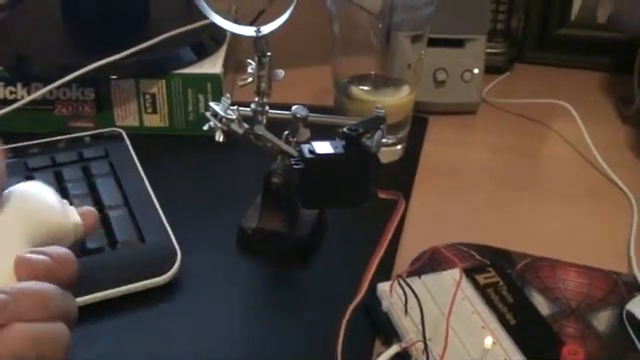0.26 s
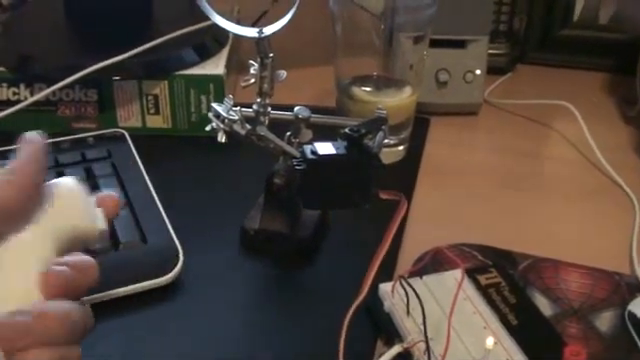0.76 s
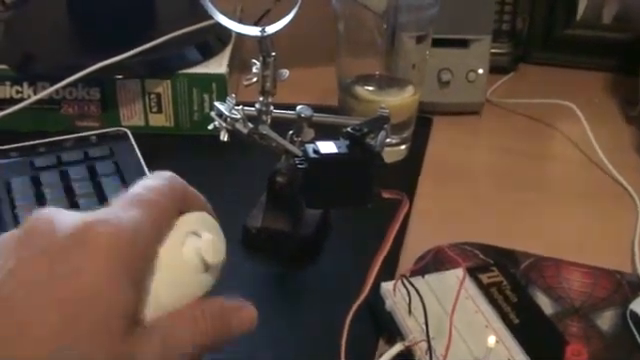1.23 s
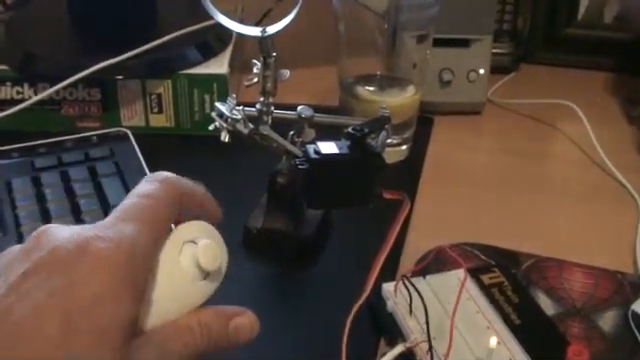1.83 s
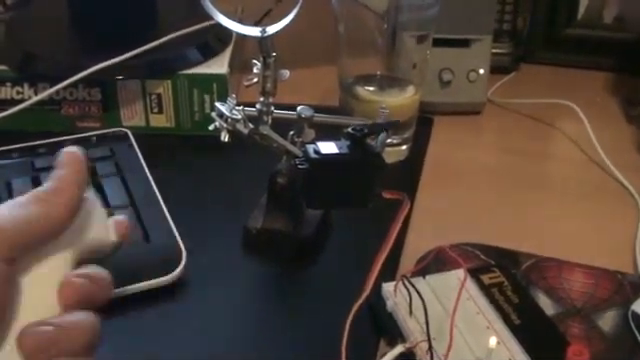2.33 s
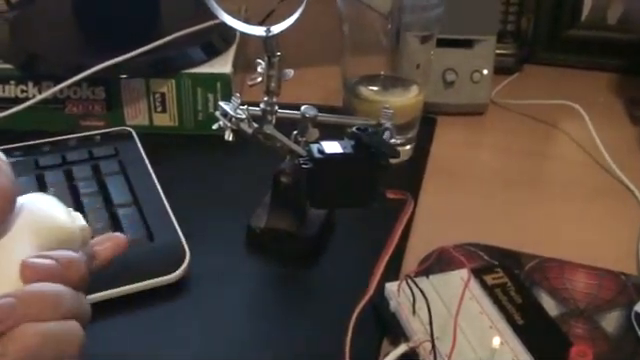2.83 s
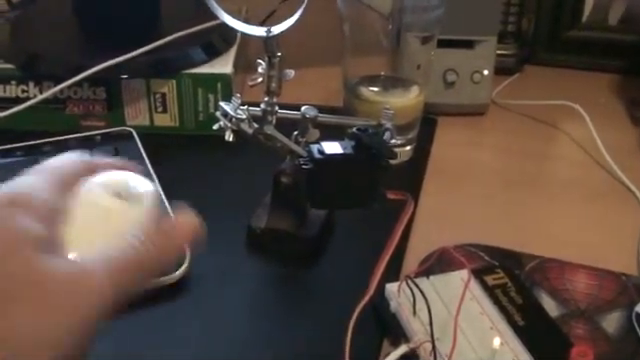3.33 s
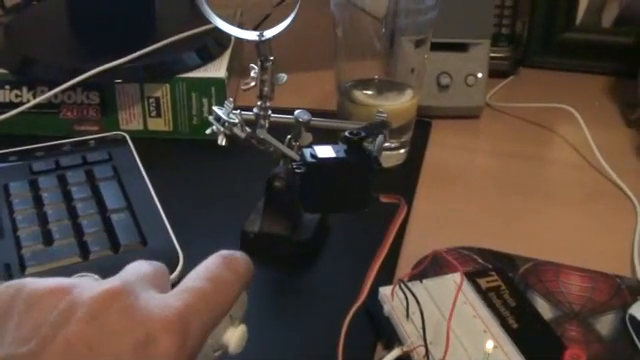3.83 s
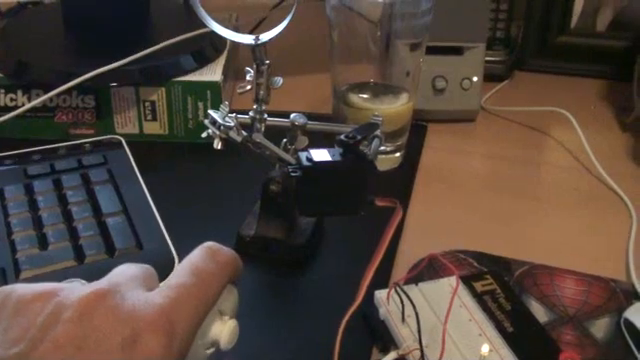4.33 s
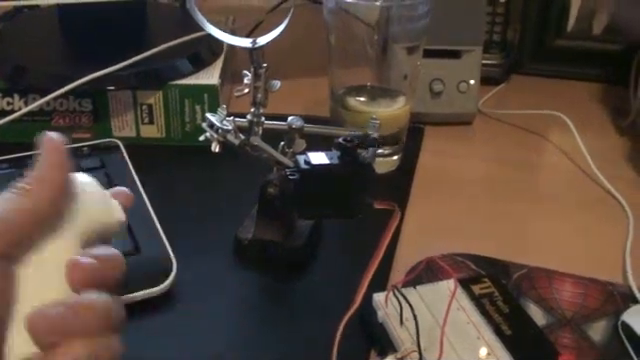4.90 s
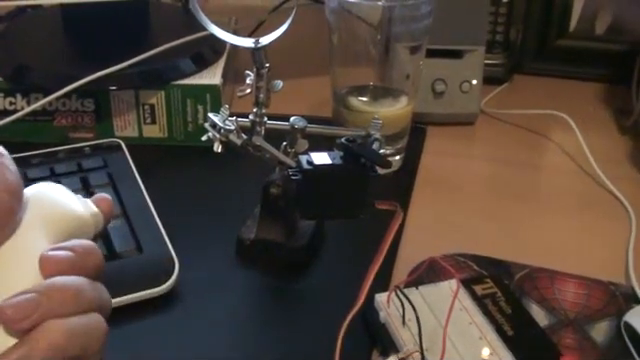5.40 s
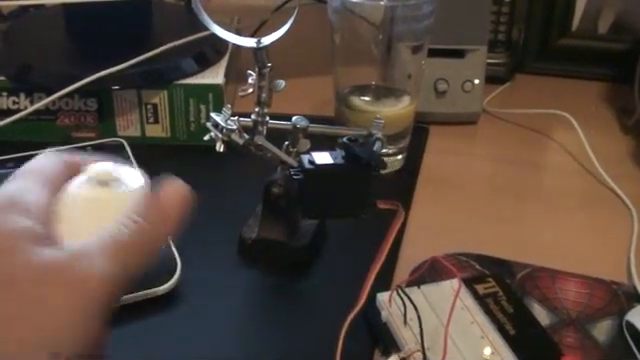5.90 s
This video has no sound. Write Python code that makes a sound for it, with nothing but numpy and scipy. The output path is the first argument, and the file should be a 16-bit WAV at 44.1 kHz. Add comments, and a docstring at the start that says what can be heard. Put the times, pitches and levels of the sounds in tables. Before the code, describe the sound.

A small geared motor on a desk makes four raspy, clicking whirs with quiet gaps between, plus a hand-held controller's sharp click and dull bump.

```python
"""A hobby servo in a clamp stand on a desk swings out and back twice: its gear teeth click and slide,
ringing the plastic case and the stand, with harder knocks, short twitches and low drones as the motor speeds up and slows.
A hand-held controller snaps and bumps: bursts of force ring its button and its hollow shell; the stand creaks once.
The small, fairly live room adds decaying noise as echoes, with fan air, microphone hiss and humming tones.
All is heard in stereo, with the servo's direct sound well above its echoes."""
import sys
import numpy as np
from scipy import signal
from scipy.fft import rfft, irfft
from scipy.io import wavfile

SR = 44100
rng = np.random.default_rng(int(sys.argv[2]) if len(sys.argv) > 2 else 0)


def wrap_up_sound(samples):
    """Save the sound to the file named by the first command line argument, as 16-bit audio."""
    columns = np.atleast_2d(samples).T
    # keep every value between -1 and 1, then stretch to whole-number steps
    tamed = np.clip(columns, -1, 1)
    steps = np.round(tamed * 32767).astype(np.int16)
    wavfile.write(sys.argv[1], SR, steps)


N = 271215
TIME = np.arange(N) / SR


def undb(db):
    """Decibels to gain."""
    return 10 ** (np.asarray(db) / 20)


def unit(x):
    """Scale a response to an energy of one."""
    return x / np.sqrt(np.sum(x ** 2))


def convolve(x, response):
    """Pass a sound through a response."""
    return signal.fftconvolve(x, response)[:N]


def spectrum(points, hz):
    """Gain at each frequency, interpolated over log frequency from (pitch_hz, level_db) points."""
    point_hz, point_db = np.transpose(points)
    return undb(np.interp(np.log(hz + 1), np.log(point_hz), point_db))


def walk(rate):
    """Random drift through `rate` new values a second; it holds the last value if they run out."""
    steps = rng.standard_normal(N // 100)
    return np.interp(TIME * rate, np.arange(len(steps)), steps)


def causal(gain):
    """The spectrum with these gains whose response dies away soonest (minimum phase)."""
    cepstrum = irfft(np.log(gain + 1e-9))
    half = len(cepstrum) // 2
    cepstrum[1:half] *= 2
    cepstrum[half + 1:] = 0
    return np.exp(rfft(cepstrum))


def body(modes, dips=(), size=8192):
    """Impulse response, of unit energy, of an object with (pitch_hz, width_hz, level_db) modes and dips."""
    f = np.fft.rfftfreq(size, 1 / SR) + 1

    def bell(hz, width):
        return 1 / (1 + ((f * f - hz * hz) / (f * width)) ** 2)

    power = sum(undb(db) ** 2 * bell(hz, width) for hz, width, db in modes)
    dip_gain = undb(sum(db * bell(hz, width) ** 2 for hz, width, db in dips))
    return unit(irfft(causal(np.sqrt(power) * dip_gain)))


def blows(rows, size=4096):
    """Contact force of (start_s, level_db, length_s) blows: a dying scrape with no colour of its own."""
    force, t = np.zeros(N + size), np.arange(size) / SR
    for start, db, length in rows:
        decay = np.exp(-np.log(1000) * t / length)  # 60 dB down after its length
        scrape = rfft(rng.standard_normal(size) * decay)
        white_scrape = irfft(scrape / causal(np.abs(scrape)))
        first = int(start * SR)
        force[first:first + size] += undb(db) * white_scrape
    return force[:N]


def disperse(x, spread=0.55, stages=(11, 26)):
    """A blow smears in time on its way through plastic parts, keeping its colour (all-pass filters)."""
    for lag in stages:  # in samples
        poles = np.r_[1, np.zeros(lag - 1), spread]
        x = signal.lfilter(poles[::-1], poles, x)
    return x


# colour of the air noise: pitch_hz, level_db (per Hz, relative)
AIR_COLOUR = [(15, -54), (25, -17), (49, -6.5), (81, -8), (106, -8.5), (181, 0), (213, -2), (363, -3),
              (415, -7), (475, -4), (515, -2.5), (558, -5.5), (856, -4), (2630, -11.5), (9000, -19.5),
              (15000, -19.5)]
# stereo width of the air noise: pitch_hz, side_minus_mid_db
AIR_WIDTH = [(60, -16), (110, -11.5), (200, -10.5), (380, -3), (690, -1.5), (1270, -1), (2350, -1.5),
             (4330, -3.5), (7970, -6.5), (11000, -8), (12000, -29)]
# course of the air noise: time_s, level_db (before the offset air_db)
AIR_LEVEL = [(0.0, -60.5), (1.63, -62.5), (3.77, -59), (6.15, -60)]
# mains and fan tones: pitch_hz, level_db (before the offset hum_db)
HUM_TONES = [(59.2, -77.5), (118.4, -76), (366.1, -75), (479.1, -74.5), (839.8, -76.5), (1626, -76.5),
             (1922, -81), (2885, -80)]


def background(air_db=4.0, hum_db=0.1, waver=0.00158):
    """Fan air and microphone hiss as coloured noise, with mains and fan tones of slightly wavering pitch."""
    f = np.fft.rfftfreq(N, 1 / SR)
    colour = spectrum(AIR_COLOUR, f)
    mid = irfft(rfft(rng.standard_normal(N)) * colour, N)
    side = irfft(rfft(rng.standard_normal(N)) * colour * spectrum(AIR_WIDTH, f), N)
    gain = undb(air_db + np.interp(TIME, *np.transpose(AIR_LEVEL))) / mid.std()
    hum = np.zeros(N)
    for hz, db in HUM_TONES:
        phase = 2 * np.pi * np.cumsum(hz * (1 + waver * walk(12))) / SR
        hum += undb(db + hum_db) * np.sqrt(2) * np.sin(phase)
    return gain * np.array([mid + side, mid - side]) + hum


# finger touches on the controller, and a creak of the servo stand at 3.477 s:
# start_s, snap_db (button ring), thud_db (shell ring), length_s (contact)
TOUCHES_AND_CREAK = [(1.801, -30.5, -26.5, 0.038), (2.008, -32, -40, 0.02), (2.012, -16.5, -36, .025),
                     (2.0262, -5, -41, 0.008), (2.0282, -12.5, -37, 0.0085), (2.539, -45, -17, 0.023),
                     (2.583, -43, -27, 0.0084), (3.477, -37.5, -30, 0.015)]
# ring of the button: pitch_hz, width_hz, level_db (relative)
BUTTON_RING = [(2000, 590, -9), (2700, 320, -1), (3560, 550, -6.5), (4340, 380, 2.5), (4500, 390, 1),
               (5600, 650, -8), (6630, 540, -7.5), (10000, 1100, -11), (12400, 660, -10)]
# hollow ring of the shell: pitch_hz, width_hz, level_db (relative)
SHELL_RING = [(648, 72, 3), (790, 120, -34), (1880, 420, -13.5)]


def controller_and_creak():
    """Each touch rings the button and the hollow plastic shell; the stand's creak borrows both rings."""
    snaps = blows([(start, snap_db, length) for start, snap_db, thud_db, length in TOUCHES_AND_CREAK])
    thuds = blows([(start, thud_db, length) for start, snap_db, thud_db, length in TOUCHES_AND_CREAK])
    return disperse(convolve(snaps, body(BUTTON_RING)) + convolve(thuds, body(SHELL_RING)))


def reverberation(build_s=0.0023, size=32768):
    """Diffuse echoes of the room: noise that builds up, then decays, lasting longest around 4 kHz."""
    t, f = np.arange(size) / SR, np.fft.rfftfreq(size, 1 / SR)
    centres_hz, t60s_s = [700, 4000, 13000], [0.4, 0.61, 0.43]
    noise, tail = rfft(rng.standard_normal(size)), np.zeros(size)
    for share, t60 in zip(np.eye(len(centres_hz)), t60s_s):
        band = irfft(noise * np.interp(f, centres_hz, share))
        tail += band * np.exp(-np.log(1000) * t / t60)
    return unit(tail * (1 - np.exp(-t / build_s)))


# stereo width of the servo and controller: pitch_hz, side_db
SOURCE_WIDTH = [(200, -20), (900, -8), (1800, -30), (3200, -53), (4500, -31.5), (7500, -13), (9500, -8),
                (11150, 1.5), (11800, -44)]


def room(x, wet_db):
    """Direct sound and echoes in stereo; the side signal is turned by a quarter cycle."""
    mid = x + undb(wet_db) * convolve(x, reverberation())
    across = 0.5 * x + undb(wet_db) * convolve(x, reverberation())
    width = spectrum(SOURCE_WIDTH, np.fft.rfftfreq(N, 1 / SR))
    side = irfft(1j * rfft(across) * width, N)
    return np.array([mid + side, mid - side])


# resonances of servo and stand: pitch_hz, width_hz, out_db (swinging out), back_db (swinging back), relative
SERVO_MODES = [(184, 150, -23.5, -19), (533, 310, -20, -22.5), (900, 280, -42, -25), (1108, 58, -4.5, -8),
               (1343, 120, -7.5, -10.5), (1740, 210, -10.5, -10), (2109, 82, -7.5, -8.5),
               (2740, 570, -13, -19.5), (3610, 610, -13.5, -20.5), (3940, 530, -7.5, -11.5),
               (4475, 140, -2.5, -9), (4930, 410, -4.5, -9.5), (5200, 150, -5, -5.5),
               (5775, 190, 0.5, -1.5), (6250, 160, -26.5, -14), (6325, 125, 5, 1.5), (6800, 206, 5, 2),
               (7340, 280, 0.5, -20), (7470, 210, 3, 3.5), (7910, 270, -0.5, -6), (8670, 270, -8, -8.5),
               (9110, 740, -5, -6), (10440, 160, -10, -18), (11420, 420, -7.5, -46), (11400, 940, -8, -9.5),
               (12320, 610, -4, -8.5), (13700, 280, -10, -22), (13100, 900, -18.5, -10),
               (14640, 180, -15, -19)]
# dips in the ring of case and stand, some nearly flat: pitch_hz, width_hz, level_db
SERVO_DIPS = [(1216, 36, -9), (1900, 95, -3), (3270, 110, 0.5), (4180, 130, 0), (5540, 160, -0.5),
              (6040, 90, -1), (6780, 120, -1), (7415, 180, -26), (8050, 130, -5)]
STAND_TOP_HZ = 2400  # modes up to here belong to the stand, those above to the case


def case_and_stand(direction):
    """Responses of case and stand; each direction loads the other tooth flanks."""
    modes = [(hz, width, dbs[direction]) for hz, width, *dbs in SERVO_MODES]
    case = body([mode for mode in modes if mode[0] > STAND_TOP_HZ], SERVO_DIPS)
    stand = body([mode for mode in modes if mode[0] <= STAND_TOP_HZ], SERVO_DIPS)
    return case, stand


def teeth(scatter_db, per_second=4200, slide=0.55):
    """Dense tooth clicks of uneven size over sliding friction; the loose gears bunch them together."""
    size = undb(scatter_db * np.minimum(rng.exponential(size=N), 2 * np.e))
    clicks = (rng.random(N) < per_second / SR) * size * np.sign(rng.standard_normal(N))
    force = clicks / clicks.std() + slide * rng.standard_normal(N)
    flutter_db, surge_db = -1.0 * walk(520), 1.25 * walk(70)
    force = force * undb(flutter_db + surge_db)
    return force / force.std()


SURGE_S = 0.009  # time constant of the jerk from the starting current
BRAKE_DB_PER_S = 116  # the rattle fades at this rate as the motor slows


def speed_db(start, brake, jerk_db, slow_db, run_up_s):
    """Rattle relative to full speed: the motor jerks, runs up, holds, then brakes."""
    age = np.maximum(TIME - start, 0)
    jerk = jerk_db * np.exp(-age / SURGE_S)
    run_up = -slow_db * np.exp(-age / run_up_s)
    braking = -BRAKE_DB_PER_S * np.maximum(TIME - brake, 0)
    return jerk + run_up + braking


def gate(start, stop, release_s):
    """One while the motor is driven, dying away after it stops."""
    return (TIME >= start) * np.exp(-np.maximum(TIME - stop, 0) / release_s)


# each swing: start_s, brake_s, stop_s, direction (0 out, 1 back), rattle_db (full speed, before case_db),
# shake_db (of the stand, before stand_db), scatter_db (of the tooth clicks)
SERVO_SWINGS = [(2.4433, 2.893, 3.24, 0, -34.5, -53.5, 1.5), (3.585, 4.083, 4.107, 1, -31, -51, 2),
                (4.9055, 5.364, 5.53, 0, -33, -51.5, 0), (6.126, 6.6, 6.67, 1, -29.5, -47, 1.5)]
# per direction, out then back: jerk_db (at the start), slow_db (below full speed at the start), run_up_s,
# end_db (extra shaking at the end of travel), rising_db (drone speeding up), falling_db (slowing down)
SWING_STROKES = [(8.5, 10, 0.13, 5, -59.5, -62), (0.5, 5, 0.044, 1.5, -59, -69)]
SHAKE_SHARE = 0.5  # dB of shaking in the stand per dB of rattle
END_OF_TRAVEL_S = 0.12  # the stand shakes harder about this long either side of the braking point
DRONE_AFTER_START_S, DRONE_AFTER_BRAKE_S = 0.125, 0.06


def swings(cases, stands, case_db=-0.5, stand_db=0.5, release_s=0.042):
    """The turning gear train rings the case and shakes the stand, which drones twice in each swing."""
    out = np.zeros(N)
    for start, brake, stop, direction, rattle_db, shake_db, scatter_db in SERVO_SWINGS:
        way = int(direction > 0.5)
        jerk_db, slow_db, run_up_s, end_db, rising_db, falling_db = SWING_STROKES[way]
        speed = speed_db(start, brake, jerk_db, slow_db, run_up_s)
        end_of_travel = end_db * np.exp(-((TIME - brake) / END_OF_TRAVEL_S) ** 2)
        shaking = SHAKE_SHARE * speed + end_of_travel
        force = teeth(scatter_db) * gate(start, stop, release_s)
        out += convolve(force * undb(case_db + rattle_db + speed), cases[way])
        out += convolve(force * undb(stand_db + shake_db + shaking), stands[way])
        out += drone(start + DRONE_AFTER_START_S, rising_db)
        out += drone(brake + DRONE_AFTER_BRAKE_S, falling_db)
    return out


# the hardest knocks of the gears taking up their slack: start_s, level_db
GEAR_KNOCKS = [(2.461, -21), (2.527, -15), (2.681, -10), (2.688, -12), (2.798, -12), (3.713, -7),
               (3.832, -3.5), (3.854, -4), (3.8675, -10), (3.9201, -3.5), (3.9592, -6.5), (4.0343, -1.5),
               (4.067, -4.5)]


def knocks(case, length_s=0.0061):
    """Short blows of the gears ring the case."""
    return convolve(blows([(start, db, length_s) for start, db in GEAR_KNOCKS]), case)


def drone(centre_s, db, pitch_hz=157.3, half_s=0.025):
    """The rotor's imbalance sways the stand for a few cycles as the motor passes its resonance."""
    age = TIME - centre_s
    swell = np.exp(-(age / half_s) ** 2)
    return undb(db) * np.sqrt(2) * swell * np.sin(2 * np.pi * pitch_hz * age)


# twitches as the motor reverses or settles: start_s, length_s, rattle_db, chatter_db (loose gears)
MOTOR_TWITCHES = [(2.982, 0.02, -39.5, -50), (3.054, 0.026, -48, -51.5), (3.507, 0.045, -39.5, -44),
                  (5.53, 0.013, -49, -51), (6.036, 0.073, -39.5, -46)]
# resonances of the loose gears: pitch_hz, width_hz, level_db (relative)
LOOSE_GEARS = [(1690, 160, -3), (2260, 170, -1.5), (3040, 900, -6.5), (3525, 120, 3.5), (4970, 420, 4)]


def twitches(case, stand, scatter_db=2.0, attack_s=0.013, release_s=0.016, stand_db=-14):
    """Brief nudges of the motor rattle the case while the unloaded teeth bounce in their backlash."""
    rattle, chatter = np.zeros(N), np.zeros(N)
    for start, length, rattle_db, chatter_db in MOTOR_TWITCHES:
        attack = np.clip((TIME - start) / attack_s + 0.5, 0, 1)
        drive = attack * gate(start - attack_s, start + length, release_s)
        rattle += undb(rattle_db) * drive
        chatter += undb(chatter_db) * drive
    rattling = convolve(teeth(scatter_db) * rattle, case + undb(stand_db) * stand)
    return rattling + convolve(teeth(scatter_db) * chatter, body(LOOSE_GEARS))


def servo():
    """Swings, knocks and twitches travel out through the plastic parts of the servo."""
    cases, stands = zip(*[case_and_stand(direction) for direction in range(2)])
    # knocks and twitches ring with the swinging-back response
    out = swings(cases, stands) + knocks(cases[1]) + twitches(cases[1], stands[1])
    return disperse(out)


def scene():
    """Servo, controller and creak in the room, over its air and hum."""
    return background() + room(controller_and_creak(), wet_db=-3.5) + room(servo(), wet_db=-6)


def record(dry):
    """A steep elliptic low-pass cuts off the top of the treble, above 15.1 kHz."""
    return signal.sosfilt(signal.ellip(10, 0.2, 70, 15100, fs=SR, output="sos"), dry)


dry = scene()
out = record(dry)
wrap_up_sound(out)
```